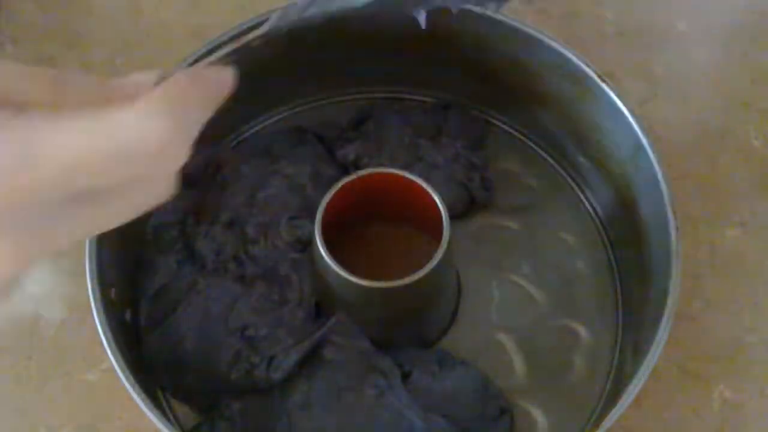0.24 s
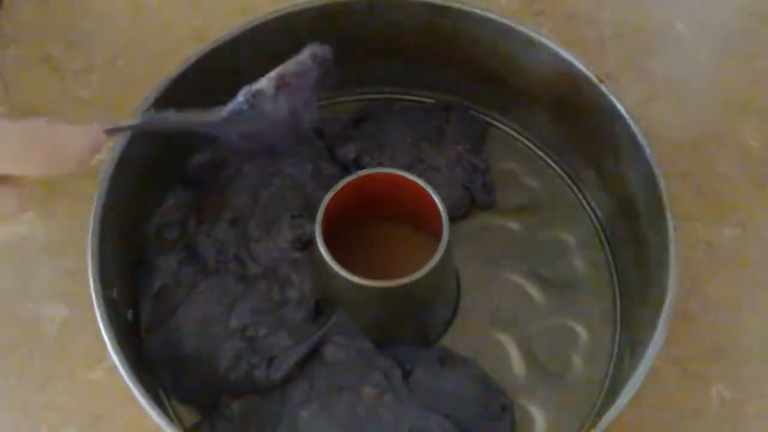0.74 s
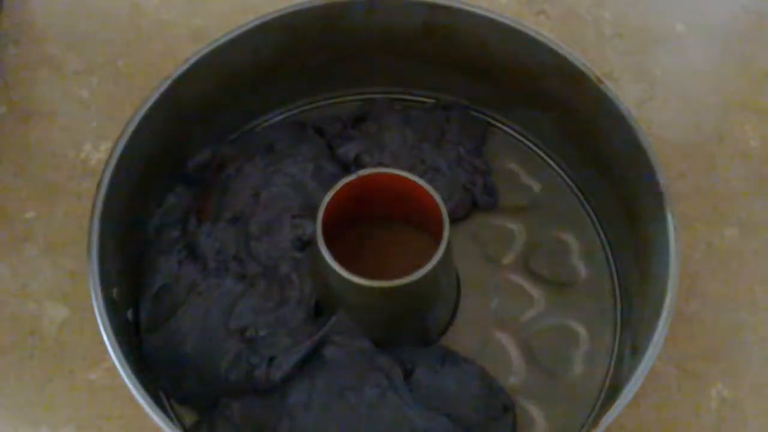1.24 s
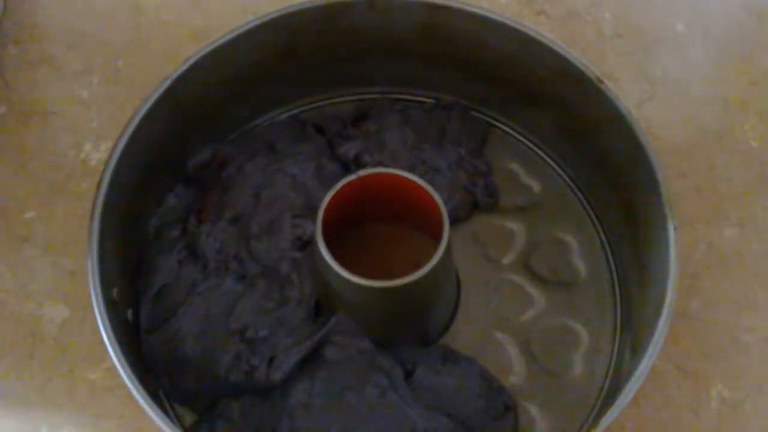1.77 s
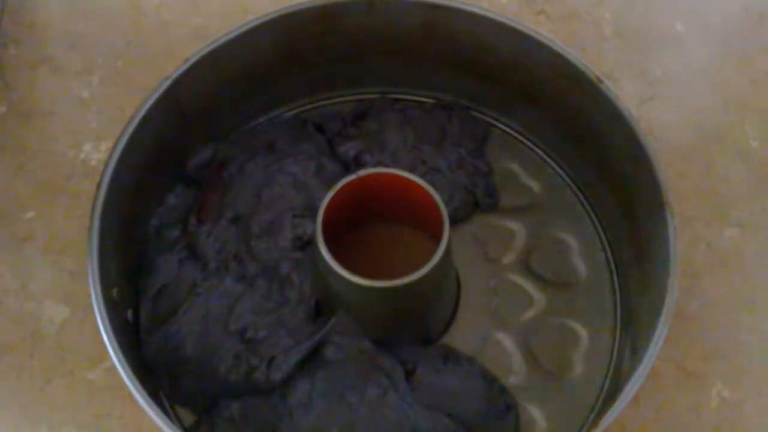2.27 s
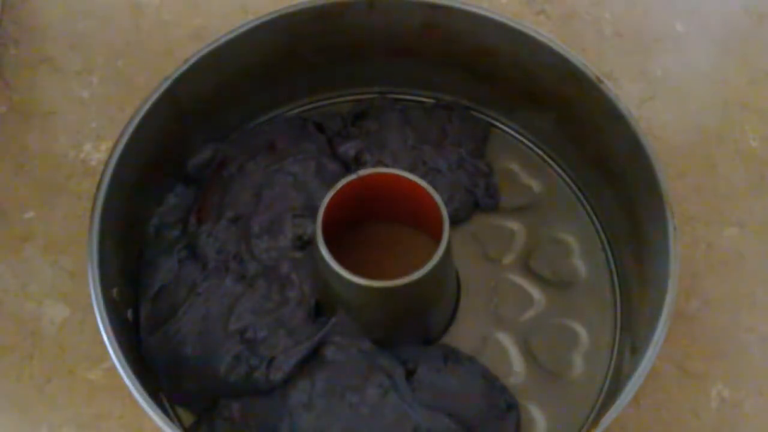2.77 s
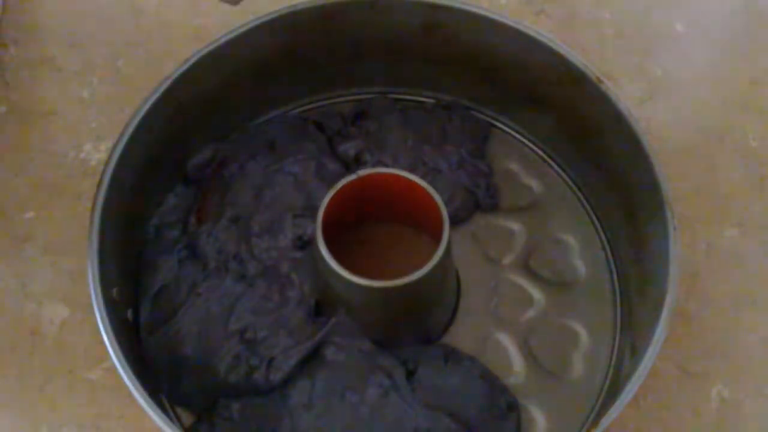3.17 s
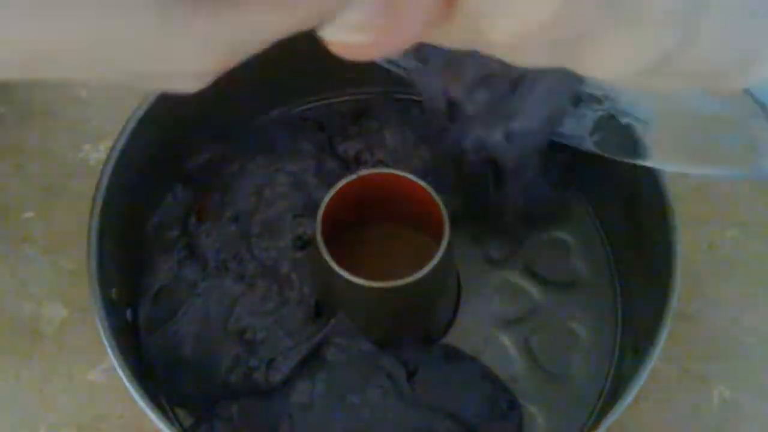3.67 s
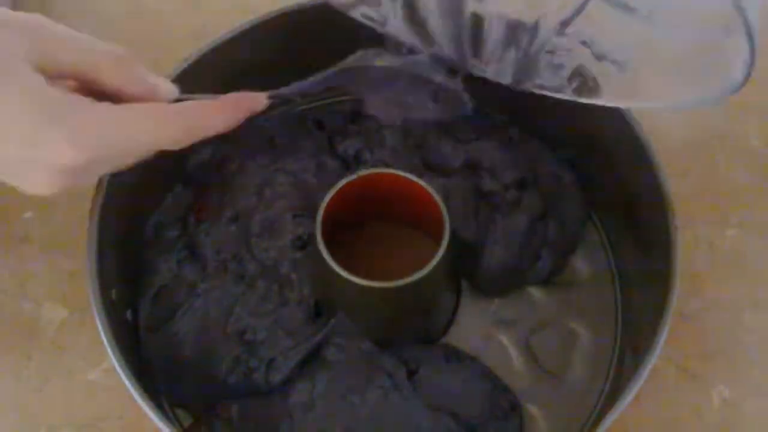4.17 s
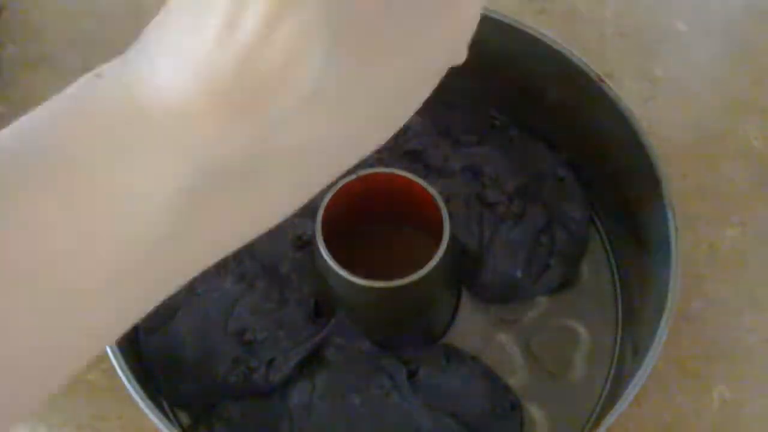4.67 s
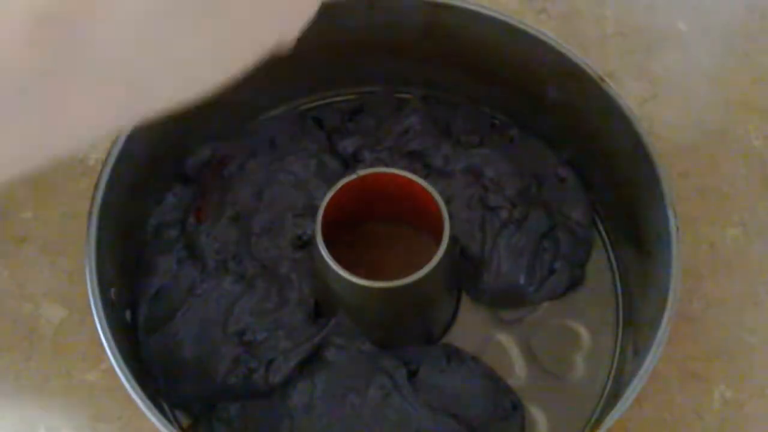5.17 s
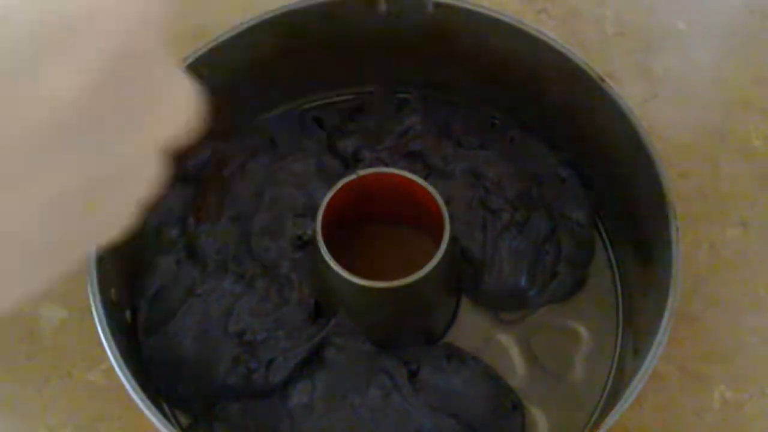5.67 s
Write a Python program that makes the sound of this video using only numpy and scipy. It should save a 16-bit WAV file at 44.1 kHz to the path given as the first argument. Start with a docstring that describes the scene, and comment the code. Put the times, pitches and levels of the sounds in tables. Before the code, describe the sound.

A spatula clicks and taps against a glass bowl in bursts, with faint sticky batter smacks and dull pan knocks in a quiet kitchen.

```python
"""A spatula ticks against a glass bowl, close up, as thick batter is scraped into a metal cake pan.
Each tick is a hard noise crack, then the bowl's resonances and the blade's pings; some ticks jolt the left microphone.
Batter smacks are clusters of tiny random slips; a few dull knocks make the filled pan ring briefly.
Behind lie a faint gliding drone, shaped noise for the kitchen air and two steady hum tones."""
import sys
import numpy as np
from scipy import signal
from scipy.fft import rfft, irfft
from scipy.io import wavfile
from scipy.ndimage import uniform_filter1d

SR = 44100
rng = np.random.default_rng(int(sys.argv[2]) if len(sys.argv) > 2 else 0)


def master(y):
    """Save y as 16-bit WAV."""
    cut = np.clip(np.atleast_2d(y).T, -1, 1)
    pcm = np.round(cut * 32767)  # scale
    wavfile.write(sys.argv[1], SR, pcm.astype(np.int16))


N = 261072

# spatula on glass; edge runs from the flat of the blade (0) to its tip (1), after-ring is low if the blade stays on:
# start_s, strength_db, brightness_db, edge (0-1), after_ring_db
TICKS = [(1.2228, -49.5, 6.5, 0.16, -6), (1.379, -42.5, 5.5, 0.14, -3), (1.5123, -48.5, 15.5, 0.48, 1),
         (1.6386, -43, 4.5, 0.1, -1.5), (1.8228, -46.5, -0.5, 0.19, -4), (1.9825, -54, -3, 0.18, -5.5),
         (2.239, -60, 9, 0.2, -7), (2.4183, -42.5, 4, 0.32, -4), (2.5652, -39.5, 2, 0.47, -2.5),
         (2.5962, -51, 3.5, 0.13, 4), (2.6186, -39, 4.5, 0.21, -8.5), (2.679, -39, -1.5, 0.47, -3),
         (2.7071, -44.5, 6.5, 0.15, -0.5), (2.751, -46, -6, 0, -8.5), (2.8133, -48.5, -5.5, 0.03, -9),
         (2.8422, -49.5, 8, 0.28, -11), (2.8719, -40.5, 0.5, 0.42, -6), (2.8967, -53.5, 9.5, 0.24, -16),
         (2.9265, -40, -0.5, 0.33, 4), (2.947, -46.5, 7.5, .2, -12), (2.9799, -41.5, 2.5, 0.37, -3),
         (2.9922, -46, 4.5, 0.6, -6.5), (2.9984, -51.5, 5, 0, -17), (3.032, -40.5, 2, 0.44, -1.5),
         (3.046, -49, 7, 0.67, -10), (3.0909, -41.5, 1.5, 0.33, -1.5), (3.1532, -41, 1, 0.76, 0.5),
         (3.1778, -49, 9.5, 0.55, -7), (3.2087, -44, 6, 0.85, -3), (3.975, -44.5, 5, 0.33, -6),
         (4.0409, -46.5, 9, 0.19, 8.5), (4.7137, -39.5, 0, 0.48, -4), (4.7558, -60, 6, 0.07, -3),
         (4.9083, -39.5, 1.5, 0.9, -5), (4.951, -43, 1, 0.6, -12), (4.999, -38, 0, 0.98, 1),
         (5.0605, -42, 2.5, 1, -3), (5.1259, -43, 3.5, 1, -10), (5.2351, -44.5, 3, 0.41, -4.5),
         (5.3507, -43, 4.5, 0.72, -4.5), (5.463, -61.5, 7, 0.13, -7)]
# thumps reaching the left microphone under some ticks: start_s, relative_level_db
JOLTS = [(1.51, -50.5), (2.679, -62), (2.706, -51.5), (2.81, -58.5), (3.032, -51), (3.153, -48),
         (3.209, -43.5), (3.973, -54.5), (4.041, -40.5), (4.712, -41.5), (4.908, -41), (5, -40),
         (5.061, -51.5), (5.124, -56), (5.237, -51), (5.349, -55.5)]
# batter smacks and smears; dullness is low for a thin film, high for a thick lump:
# start_s, strength_db, dullness_db, contact_s
SMACKS = [(0.3431, -69, 2.5, .005), (.561, -61.5, -10.5, .0014), (0.579, -61, -9.5, 0.012),
          (.649, -60.5, -19, 0.0035), (0.667, -65, -21, 0.04), (.691, -59, -9.5, 0.011),
          (1.081, -73, 8, 0.0018), (1.546, -68, -3, .0014), (3.121, -72, 10, 0.002),
          (3.374, -76.5, -2, 0.0044), (3.383, -65.5, 3, 0.0077), (3.4662, -82.5, 25.5, 0.0016),
          (3.661, -76, 10.5, 0.0034), (3.717, -69.5, 12, 0.0036), (3.7772, -69, 14.5, 0.0024),
          (3.8, -80, -1, 0.0028), (3.8325, -78.5, 25, 0.0015), (3.8436, -70, 6, .0035),
          (3.864, -83, 4, .0015), (3.9021, -81, 28, 0.0013), (4.2025, -69, -7.5, 0.0028),
          (4.579, -88, 15, 0.024), (4.779, -76, -4, 0.0023), (5.6439, -76.5, -7, 0.0058)]
# colour of a smack at zero dullness, as body, knock, hiss and fizz: level_db each
SMACK_COLOUR_DB = [-1.5, 1, 7.5, 3.5]
# how those four follow the dullness: change in dB per dB each
SMACK_PER_DULL_DB = [1, 0.59, 0.073, -0.1]
# dull knocks on the pan: start_s, level_db, contact_s, muffling_corner_hz
KNOCKS = [(0.628, -58.5, 0.043, 890), (0.9048, -41.5, 0.014, 7000), (0.911, -43, 0.019, 1060),
          (0.972, -43, 0.007, 5150), (3.748, -55.5, 0.05, 1100)]
# faint far drone: start_s, length_s, first_pitch_hz, last_pitch_hz, level_db
DRONE_GLIDES = [(0.097, 0.71, 360, 322, -69), (2.704, .62, 296.8, 367, -61),
                (3.697, .62, 317.4, 382.4, -65), (4.247, 1.0, 324, 316, -65),
                (5.506, 0.48, 351.5, 365.3, -60.5)]
# kitchen air spectrum, per Hz: pitch_hz, relative_level_db
AIR_SPECTRUM = [(20, 9.5), (45, -2.5), (66, 6.5), (90, -1.5), (180, -4), (290, 0.5), (450, -10.5),
                (1050, -18), (1700, -28), (2200, -43), (2950, -40), (4200, -30.5), (9000, -28),
                (14500, -20), (16000, -25.5)]
# likeness of the air in the two channels: pitch_hz, likeness (0-1)
AIR_LIKENESS = [(30, 0.033), (100, 0.39), (250, 0.77), (1000, 0.69), (3000, 0.11), (15000, 0.098)]
# stereo balance of the air: pitch_hz, left_minus_right_db
AIR_BALANCE = [(30, 0), (120, 2), (400, 2.5), (15000, -4.5)]
# hollow resonances colouring the air: pitch_hz, width_hz, height_db
HOLLOWS = [(494, 13, 2.5), (712, 13, 10), (1035, 30, 3)]
# steady hum tones: pitch_hz, relative_level_db
HUM_TONES = [(245.6, -63.5), (318, -73)]
# resonances of bowl and spatula, before each contact's share: pitch_hz, width_hz, height_db
BOWL_MODES = [(705, 110, 0), (1030, 90, -1), (1790, 65, 5), (1900, 70, 2), (2090, 60, 0), (2510, 80, 3),
              (2770, 80, 3), (3120, 70, 2), (3450, 55, 8), (3590, 55, 8), (3750, 80, 4), (3930, 70, 2),
              (4230, 80, 1), (4770, 100, 5), (7250, 600, 0), (11300, 600, 1)]
# broad colour of the bowl over the pan: pitch_hz, level_db
BOWL_TIMBRE = [(90, 1), (190, 3), (300, 3), (460, -4), (680, 2), (790, -2), (1030, 4), (1200, -7),
               (1450, 1), (2100, -3.5), (2600, -2.5), (4800, 0.5), (6200, -6), (9000, 0)]
# batter-damped pan, before its share and sharpening: pitch_hz, width_hz, height_db
PAN_MODES = [(275, 24, 19), (400, 50, 14), (570, 50, 11), (720, 60, 15), (820, 70, 8), (1130, 90, 5),
             (1780, 120, 6), (2350, 300, 4), (3400, 140, 5)]
# borders of body, knock, ring, hiss and fizz: edge_hz
BAND_EDGES_HZ = [300, 1400, 2900, 4300, 9500, 16000]
# how the housing favours the left microphone: pitch_hz, left_minus_right_db
SHADOW = [(300, 1), (1700, -1), (2900, 2.5), (3800, -2), (6000, 5), (10000, 3.5), (12800, -5.5),
          (14500, 0.5)]
# phase by which the left microphone leads: pitch_hz, lead_rad
PHASE_LEAD = [(0, 0.61), (800, .08), (3400, 0.7346), (5600, 2.14), (7500, 2.23), (10200, 3.93),
              (12000, 5.7), (14000, 11), (16000, 11)]
# where the bowl is held, heard mostly in the treble: time_s, left_minus_right_db
BOWL_PLACE = [(.6, 0.5), (1.7, -1), (2.4, 2.5), (3, 0.1), (3.5, 6), (4.1, 3), (5, .5)]

SIZE = 8192  # samples worked on per contact
T, HZ = np.arange(SIZE) / SR, np.fft.rfftfreq(SIZE, 1 / SR)
FIRM_DB = -45  # strength of an ordinary tick; lighter ones are duller
BODY_DB, BODY_PER_DB = -11, -.5  # body of an ordinary tick, and its change per dB of strength
KNOCK_DB, KNOCK_PER_DB = -5, -0.2152  # the same for the knock band
KNOCK_PER_BRIGHT_DB = 0.27  # a bright, scraping tick also fills the knock band
# each pair: dB at the flat of the blade, dB at its tip
WEIGHT_DB = (0.4, -1.5)  # body and knock together
HISS_DB, FIZZ_DB = (2, -7.5), (-4, 9.5)
FLAT_PING_DB, TIP_PING_DB = (12.5, -20.5), (3.5, 16.5)  # heights before crack and tail take their share
FLAT_PING_HZ, TIP_PING_HZ = 7150, 14260
PING_SPREAD = 0.067  # random share by which the lower ping moves
WALL_T60_S = 0.16  # ring time of the pan's lowest mode


def ticks(chatter=0.77, chatter_s=0.00068, crack_ping=0.59, tail_ping=2.4):
    """A hard crack chatters for a moment; the bowl rings and the blade pings, higher towards its tip."""
    out = np.zeros((2, N))
    for start_s, strength_db, bright_db, edge, after_db in TICKS:
        force_db = strength_db - FIRM_DB
        weight_db = between(WEIGHT_DB, edge)
        body_db = BODY_DB + BODY_PER_DB * force_db + weight_db
        knock_db = KNOCK_DB + KNOCK_PER_DB * force_db + KNOCK_PER_BRIGHT_DB * bright_db + weight_db
        hiss_db = bright_db + between(HISS_DB, edge)
        fizz_db = bright_db + between(FIZZ_DB, edge)

        flat_hz = FLAT_PING_HZ * (1 + PING_SPREAD * rng.standard_normal())
        pings = [(flat_hz, between(FLAT_PING_DB, edge)), (TIP_PING_HZ, between(TIP_PING_DB, edge))]
        # the pings start wide and narrow as they ring on
        wide_pings = [(hz, 2200, db) for hz, db in pings]
        narrow_pings = [(hz, 480, db) for hz, db in pings]

        grit = rng.standard_normal((3, SIZE)) * np.exp(-T / chatter_s)
        shared_grit = rfft(unit(grit[0]))
        side_grit = rfft(unit(grit[1:])) * HZ / (HZ + 5000)  # the channels differ more in the treble
        crack = 1 + chatter * (shared_grit + side_grit)
        crack = crack * bowl(1.0) * causal(peaks(wide_pings, HZ, crack_ping))

        tail = scatter(t60=0.055, late_db=-46.5, late_t60=0.31, alike_hz=5030)
        tail = tail * bowl(1.0) * causal(peaks(narrow_pings, HZ, tail_ping))
        sound = (crack + gain_of(after_db) * tail) * held(start_s)
        add(out, start_s, voiced(sound, strength_db, [body_db, knock_db, hiss_db, fizz_db]))
    return out


def jolts(rise_s=0.00082, lift_db=9, right_share=0.02):
    """Some ticks shake the left microphone: one slow push and its rebound, barely heard on the right."""
    pushes = np.zeros(N)
    for start_s, db in JOLTS:
        pushes[round(start_s * SR)] = gain_of(db + lift_db) * rng.choice([-1, 1])
    push = (T / rise_s) ** 2 * np.exp(-T / rise_s)
    rebound_filter = signal.butter(1, 28, "high", fs=SR, output="sos")
    shape = signal.sosfilt(rebound_filter, push)
    left = signal.oaconvolve(pushes, shape / shape.max())[:N]
    return left * np.array([[1], [right_share]])


def smacks(tail_db=-3, sizzle_hz=13700, sizzle_db=5):
    """Sticky batter lets go of the glass in small crackles with a thin sizzle on top; thick lumps sound dull."""
    out = np.zeros((2, N))
    sizzle = causal(peaks([(sizzle_hz, 1300, sizzle_db)], HZ, 1.0))
    for start_s, strength_db, dull_db, contact_s in SMACKS:
        colour_db = np.array(SMACK_COLOUR_DB) + dull_db * np.array(SMACK_PER_DULL_DB)
        tail = scatter(t60=0.025, late_db=-28.0, late_t60=0.23, alike_hz=5000)
        crackle = rub(contact_s, grains_per_s=4500)
        sound = crackle * (1 + gain_of(tail_db) * tail) * bowl(0.2) * sizzle
        add(out, start_s, voiced(sound * held(start_s), strength_db, colour_db))
    return out


def knocks(tail_db=-5, low_cut_hz=235, wall_db=-12, sharpness=1.29):
    """A blunt touch scuffs the filled pan and rings it briefly; its lowest mode hums on."""
    out = np.zeros((2, N))
    low_cut = HZ ** 3 / (HZ ** 3 + low_cut_hz ** 3)
    ring = causal(peaks(PAN_MODES, HZ, 0.97) ** sharpness * low_cut)
    lowest_hz = PAN_MODES[0][0]
    wall = unit(np.sin(2 * np.pi * lowest_hz * T) * gain_of(-60 * T / WALL_T60_S))[:SIZE // 2]
    for start_s, db, contact_s, corner_hz in KNOCKS:
        tail = scatter(t60=0.052, late_db=-25, late_t60=0.24, alike_hz=4900)
        muffling = 1 / (1 + 1j * HZ / corner_hz) ** 2
        sound = rub(contact_s, grains_per_s=1400) * ring * (1 + gain_of(tail_db) * tail) * muffling
        scuff = unit(irfft(sound * ports(0))[:, :SIZE // 2])
        add(out, start_s, gain_of(db) * (scuff + gain_of(wall_db) * wall))
    return out


def drone(waver_hz=2, flutter_db=2):
    """Each sine glide swells and fades in one arch while its pitch slides and wavers."""
    t, out = np.arange(N) / SR, np.zeros(N)
    waver = waver_hz * drift(56)
    flutter = gain_of(flutter_db * drift(9))
    for start_s, length_s, first_hz, last_hz, db in DRONE_GLIDES:
        along = np.clip((t - start_s) / length_s, 0, 1)
        turns = np.cumsum(between((first_hz, last_hz), along) + waver) / SR
        out += gain_of(db) * np.sin(np.pi * along) * np.sin(2 * np.pi * turns)
    return out * flutter


def kitchen(air_db=-61, hum_trim_db=-2, rumble_swell_db=4.0):
    """Shaped noise gives a swelling low rumble and steady microphone hiss; sine tones hum beneath."""
    hz, t = np.fft.rfftfreq(N, 1 / SR), np.arange(N) / SR
    a, b = rfft(rng.standard_normal((2, N)))
    same = np.clip(read(AIR_LIKENESS, hz), -1, 1)
    lean = gain_of(read(AIR_BALANCE, hz) / 2)
    left = a * lean
    right = (same * a + np.sqrt(1 - same ** 2) * b) / lean
    air = np.array([left, right]) * gain_of(read(AIR_SPECTRUM, hz)) * peaks(HOLLOWS, hz, 1)

    low = 1 / (1 + (hz / 400) ** 2)
    rumble = irfft(air * low, N) * gain_of(rumble_swell_db * drift(14))
    hiss = irfft(air * (1 - low), N)
    air = rumble + hiss
    hum = sum(gain_of(db + hum_trim_db) * np.sin(2 * np.pi * f * t + drift(13) / 10) for f, db in HUM_TONES)
    return gain_of(air_db) * air / air.std() + np.sqrt(2) * hum


def rub(contact_s, grains_per_s):
    """A first touch and a cluster of tiny slips lasting as long as the contact, evened out over all pitches."""
    slips = rng.standard_normal(SIZE) * (rng.random(SIZE) < grains_per_s / SR)
    slips[0] = 0.71
    touch = rfft(unit(slips * np.exp(-(T / contact_s) ** 4)))
    smooth_power = uniform_filter1d(abs(touch) ** 2 + 0.028, size=60)
    return touch * causal(smooth_power ** -.5)


def bowl(share):
    """Every point of contact feeds the modes of the bowl differently."""
    feed = gain_of(4 * rng.standard_normal(len(BOWL_MODES)))
    return causal(gain_of(read(BOWL_TIMBRE, HZ)) * peaks(BOWL_MODES, HZ, share * feed))


def scatter(t60, late_db, late_t60, alike_hz, apart_low=0.25):
    """Dense echoes between bowl, pan and worktop, then the faint room; the bass is more alike in both ears."""
    shared, apart = rfft(rng.standard_normal((2, SIZE)))
    treble = HZ ** 2 / (HZ ** 2 + alike_hz ** 2)
    angle = np.pi / 4 * (apart_low + (1 - apart_low) * treble)
    noise = irfft(np.cos(angle) * shared + np.array([[1], [-1]]) * np.sin(angle) * apart)
    fade = gain_of(-60 * T / t60) + gain_of(late_db - 60 * T / late_t60)
    onset = 1 - np.exp(-T / 0.000046)
    return rfft(unit(noise * fade * onset))


def voiced(sound, ring_db, colour_db):
    """Gives a contact its strength in the ring band and its colour around it, from dull body to fizz."""
    edges = np.array(BAND_EDGES_HZ)
    wanted = gain_of(ring_db + np.insert(colour_db, 2, 0))  # the ring band is the reference
    bands = np.array([(HZ > lo) & (HZ <= hi) for lo, hi in zip(edges, edges[1:])])
    low_cut = HZ ** 2 / (HZ ** 2 + 95 ** 2)
    high_cut = 1 / np.sqrt(1 + (HZ / 14900) ** 44)
    sound = sound * causal(low_cut * high_cut)
    for _ in range(2):  # a second pass makes up for the smoothed band steps
        found = np.sqrt(bands @ np.mean(abs(sound) ** 2, 0) * 2 / SIZE)
        steps = np.log(wanted / found)[np.searchsorted(edges[1:-1], HZ)]
        sound = sound * causal(np.exp(uniform_filter1d(steps, size=130)))
    return irfft(sound)[:, :SIZE // 2]


def held(start_s):
    """How the microphones hear the bowl at this moment."""
    return ports(np.interp(start_s, *np.transpose(BOWL_PLACE)))


def ports(pan_db):
    """Level and phase at the two microphones; panning acts mostly on the treble."""
    treble = HZ ** 2 / (HZ ** 2 + 2200 ** 2)
    lean = gain_of((read(SHADOW, HZ) + pan_db * treble) / 2)
    lag = np.exp(-1j * np.interp(HZ, *np.transpose(PHASE_LEAD)))
    return np.array([lean, lag / lean])


def peaks(modes, hz, shares):
    """Gain of resonances over a flat response, their powers summed, each fed by its share."""
    power = 1
    for (f, width, db), share in zip(modes, shares * np.ones(len(modes))):
        power = power + share * gain_of(2 * db) / (1 + (2 * (hz - f) / width) ** 2)
    return np.sqrt(power)


def causal(gain):
    """The minimum-phase response with this gain: nothing sounds before the blow."""
    log_gain = np.log(np.maximum(gain, 1e-5))
    mirrored = np.r_[log_gain, log_gain[-2:0:-1]]
    return np.exp(signal.hilbert(mirrored).conj()[:len(gain)])


def drift(rate_hz):
    """Random sway with unit spread: 20 sines up to this rate, set every 512 samples and joined by lines."""
    t = np.arange(0, N + 512, 512) / SR
    rates = np.geomspace(rate_hz / 10, rate_hz, 20)
    sway = sum(np.sin(2 * np.pi * (f * t + rng.random())) for f in rates)
    return np.interp(np.arange(N) / SR, t, sway / sway.std())


def between(ends, share):
    """Slides from the first value to the second."""
    return ends[0] + (ends[1] - ends[0]) * np.clip(share, 0, 1)


def gain_of(db):
    """Decibels to amplitude."""
    return 10 ** (np.asarray(db) / 20)


def unit(x):
    """Scales to a mean energy of one per channel."""
    return x / np.sqrt(np.mean(np.sum(x ** 2, -1)) + 1e-20)


def read(points, hz):
    """Reads a spectrum on a log-frequency axis."""
    f, value = np.transpose(points)
    return np.interp(np.log(hz + 1), np.log(f + 1), value)


def add(mix, start_s, sound):
    """Adds a stereo sound so that unit energy means unit rms over 30 ms."""
    part = mix[:, round(start_s * SR):][:, :sound.shape[1]]
    part += sound[:, :part.shape[1]] * np.sqrt(.03 * SR)


def scene():
    """Everything on the worktop, over the drone and the kitchen."""
    return ticks() + jolts() + smacks() + knocks() + drone() + kitchen()


def record(dry):
    """The recorder's band limit: a steep low-pass at 16.1 kHz."""
    low_pass = signal.firwin(255, 16100, window=("kaiser", 9), fs=SR)
    return signal.oaconvolve(dry, low_pass[None], "same")


dry = scene()
out = record(dry)
master(out)
```